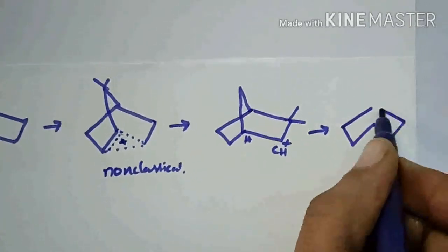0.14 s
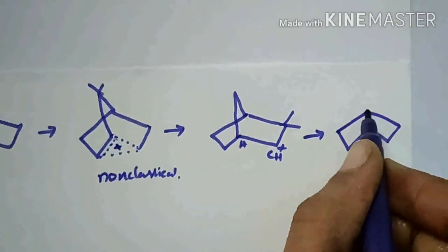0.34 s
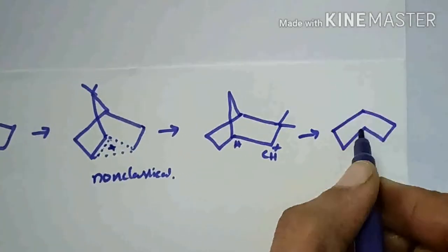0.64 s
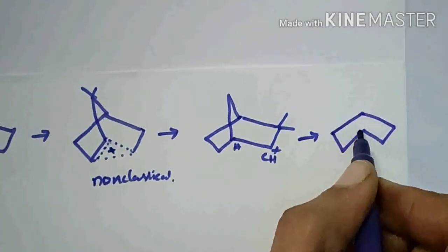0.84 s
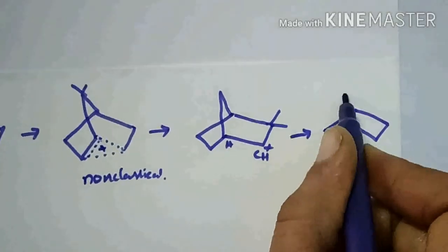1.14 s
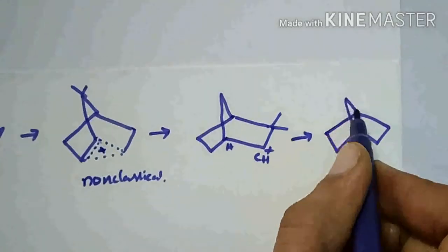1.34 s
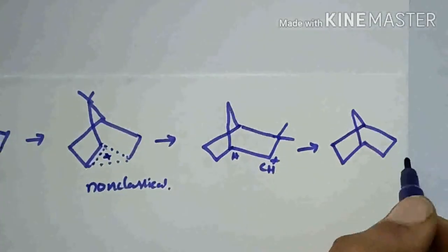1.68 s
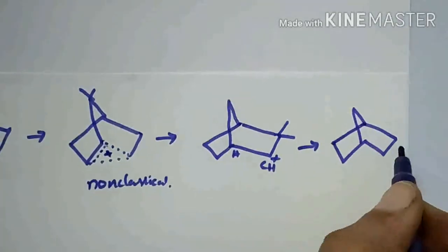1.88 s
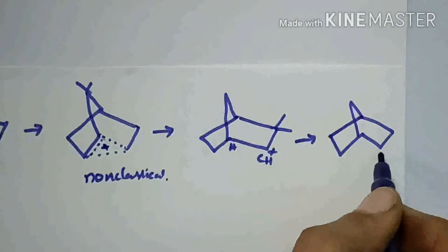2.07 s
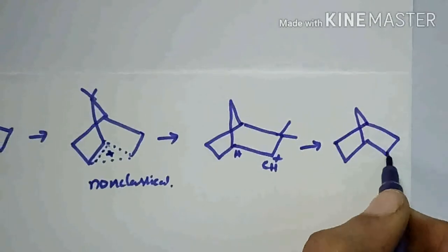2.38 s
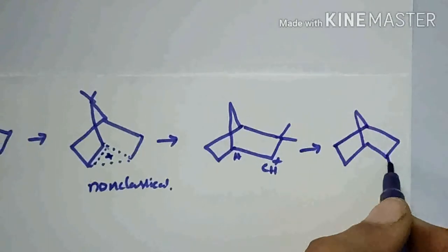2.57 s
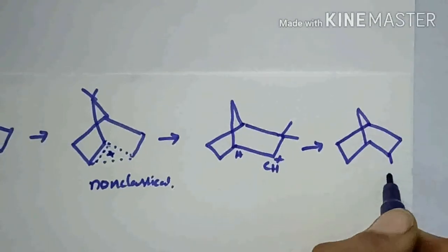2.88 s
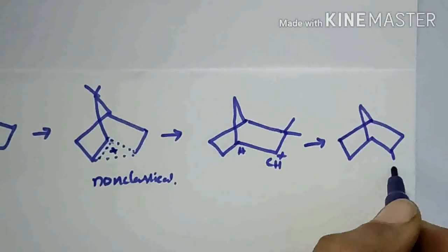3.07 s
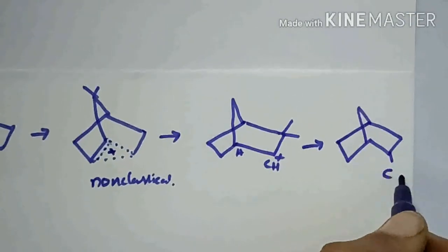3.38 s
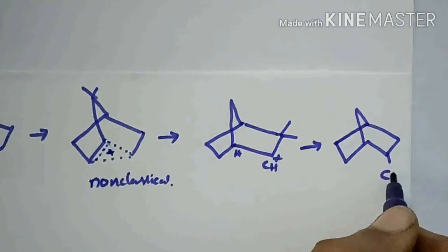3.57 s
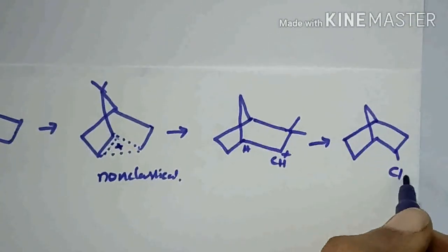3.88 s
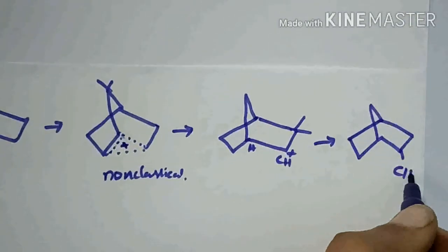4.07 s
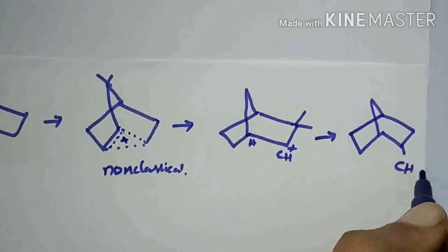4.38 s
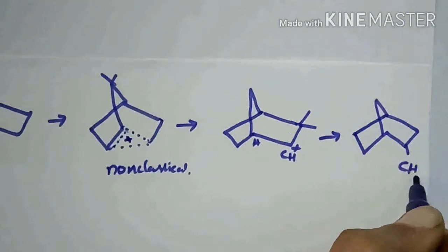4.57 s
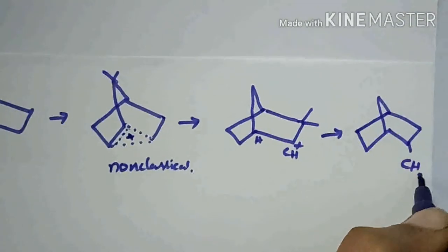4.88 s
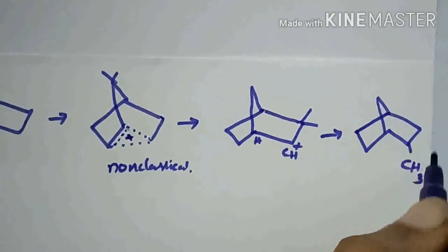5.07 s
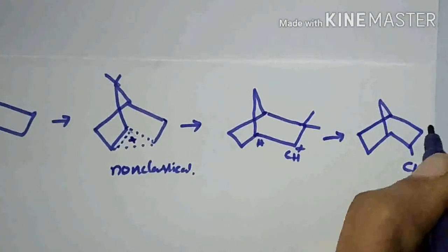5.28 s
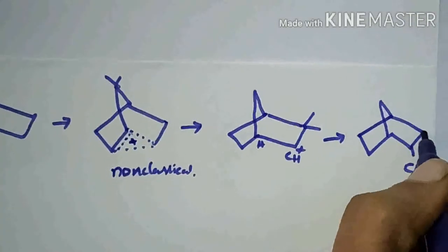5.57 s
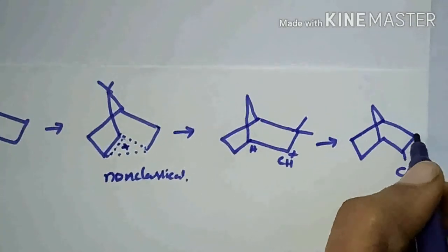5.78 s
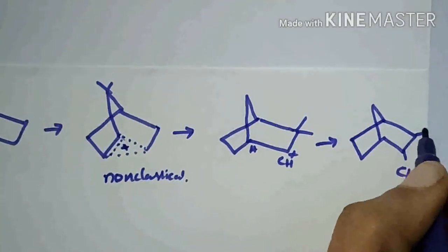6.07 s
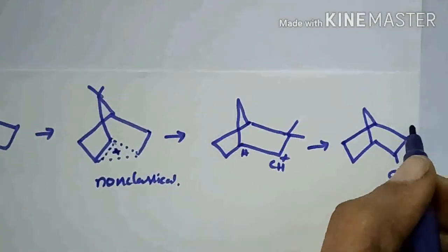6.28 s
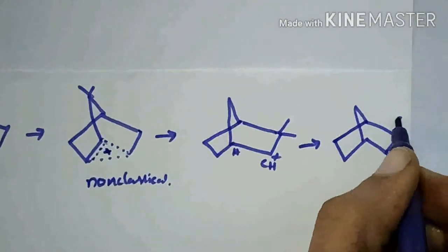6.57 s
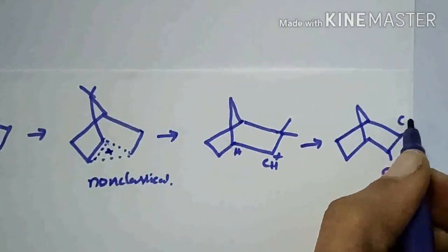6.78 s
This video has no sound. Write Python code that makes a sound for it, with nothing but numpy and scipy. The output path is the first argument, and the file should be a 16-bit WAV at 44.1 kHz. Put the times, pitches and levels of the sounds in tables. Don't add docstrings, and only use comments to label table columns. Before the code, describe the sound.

Short bright squeaky-dry marker rasps on a sheet lying on a desk, with small taps and pauses, above a faint motor hum and deep engine drone.

```python
import sys
import numpy as np
from scipy import signal
from scipy.fft import rfft, irfft, next_fast_len
from scipy.io import wavfile
from scipy.ndimage import uniform_filter1d

SR = 44100
rng = np.random.default_rng(int(sys.argv[2]) if len(sys.argv) > 2 else 0)


def wav_record(signal):
    frames = np.transpose(np.atleast_2d(signal))
    bounded = np.clip(frames, -1, 1)
    quanta = np.round(bounded * 32767).astype(np.int16)
    wavfile.write(sys.argv[1], SR, quanta)


def decibels_to_gain(level_db):
    exponent = np.asarray(level_db, float) / 20
    return 10 ** exponent


N = 306054


def rms_one(x):
    return x / np.sqrt(np.mean(x ** 2) + 1e-20)


def in_time(rows):
    s, value = np.transpose(rows)
    return np.interp(np.arange(N) / SR, s, value)


def drift(rate_hz):
    r = np.exp(-2 * np.pi * rate_hz / SR)
    wander = signal.lfilter([1], [1, -2 * r, r * r], rng.standard_normal(N + SR))
    return rms_one(wander[SR:])


def coloured(spectrum):
    hz, level_db = np.transpose(spectrum)
    size = next_fast_len(N)
    grid = np.fft.rfftfreq(size, 1 / SR) + 1
    curve_db = np.interp(np.log(grid), np.log(hz), level_db, -120, level_db[-1])
    gain = decibels_to_gain(curve_db - 60 * (grid > 16000))
    return rms_one(irfft(rfft(rng.standard_normal(size)) * gain, size)[:N])


def resonate(x, modes):
    out = 0
    for k, (hz, width_hz, level_db) in enumerate(modes):
        r = np.exp(-np.pi * width_hz / SR)
        top = (-1) ** k * decibels_to_gain(level_db) * (1 - r * r) / 2
        poles = [1, -2 * r * np.cos(2 * np.pi * hz / SR), r * r]
        out = out + signal.lfilter([top, 0, -top], poles, x + 1e-18)
    return out


def fibres(per_s, spread_db, clump_db):
    sizes = decibels_to_gain(spread_db * np.minimum(rng.exponential(1, (3, N)), 4))
    sizes = sizes * rng.choice([-1, 1], (3, N))
    happens = rng.random((3, N)) < per_s / SR
    return sizes * happens * decibels_to_gain(clump_db * drift(40))


def strokes():
    # (pitch [Hz], width [Hz], level [dB])
    felt_tip = [(6585, 1500, -5.5), (7220, 560, 0), (7530, 143, 3)]
    barrel = [(8950, 150, 5.5), (8940, 630, 2.5), (9490, 150, -0.5), (9940, 280, -5.5), (10610, 83, -0.5),
              (10440, 610, -6)]
    sizzle = [(11700, 1100, 1.5), (13100, 3700, -6.5), (14700, 1500, -11)]
    sheet_on_desk = [(1280, 610, 3), (1524, 320, 6), (1753, 245, 5), (2030, 306, 2)]
    grit = [(2450, 370, 0.5), (3514, 334, -0.5), (4026, 170, -4.5), (4430, 120, -2.5), (4800, 120, -1.5),
            (5370, 490, -5), (6400, 370, -9.5)]
    desk_boom = [(286, 30, 3), (412, 17, -3.5), (692, 120, -4.5), (910, 137, -4)]
    desk_ring = [(1045, 70, 0)]
    # (touch [s], speeding up [s], slowing down [s], scratch [dB], rasp re scratch [dB])
    pressed = [(0.047, 0.034, 0.035, -57.5, -2), (3.349, 0.014, 0.018, -71, -1),
               (5.892, 0.03, 0.012, -59, -1.5)]
    firm = [(0.099, 0.043, 0.054, -61, -3), (3.13, 0.047, 0.044, -64.5, -3),
            (3.721, 0.041, 0.018, -61.5, -13.5), (3.952, 0.014, 0.01, -61.5, -15),
            (4.059, 0.024, 0.028, -65, -7), (4.316, 0.023, 0.02, -65.5, -6.5),
            (4.368, 0.023, 0.019, -74.5, -4), (5.353, 0.041, 0.018, -70, -2.5),
            (6.551, 0.05, 0.053, -67.5, -8), (6.649, 0.03, 0.017, -71.5, -17)]
    quick = [(0.89, 0.0043, 0.029, -61, 3), (0.918, 0.044, 0.046, -47, -8.5),
             (1.045, 0.02, 0.071, -73.5, 1), (1.247, 0.019, 0.054, -59.5, -6.5),
             (1.3, 0.056, 0.03, -64.5, -2), (1.391, .021, .03, -96, 1), (1.509, 0.016, 0.064, -68.5, -4.5),
             (1.708, 0.0072, 0.044, -69.5, 2.5), (2.355, 0.026, 0.041, -64, -2.5),
             (3.043, 0.0082, 0.049, -70.5, -4.5), (3.247, 0.036, 0.0044, -58, -11),
             (4.25, 0.0085, 0.0088, -65.5, -10), (4.953, 0.027, 0.015, -53, -15.5),
             (5.016, 0.025, 0.026, -63.5, -18), (5.067, 0.022, 0.055, -59, -14.5),
             (5.073, 0.0046, 0.0074, -59, -28), (5.16, 0.035, 0.044, -66.5, -7)]
    grazes = [(.2, 0.096, 0.093, -80, 1), (0.463, 0.02, 0.0062, -74.5, -3),
              (1.858, .024, 0.21, -76.5, -4.5), (2.228, 0.018, 0.014, -76, -19),
              (2.679, 0.054, 0.074, -78, -8), (3.311, 0.016, 0.0047, -77, -10),
              (3.634, 0.012, 0.02, -75, -20), (4.59, 0.049, 0.042, -73, -6.5),
              (4.732, 0.038, 0.024, -70.5, -10), (5.258, 0.055, 0.024, -73, -14),
              (5.64, 0.019, 0.04, -79, -18), (6.351, 0.0089, 0.016, -78, -6),
              (6.46, 0.0092, 0.049, -74.5, -8)]
    knocks = [(3.9068, 0.0018, 0.02, -72.5, 18), (3.925, 0.012, 0.051, -83.5, 17.5)]
    # (touch-down re fastest [dB], sizzle re scratch [dB], then re rasp: grit, boom, ring [dB])
    kinds = [
        (-2, -5.5, 4, -1.5, 8),
        (-4.5, -4.5, 3, 2, -0.5),
        (-13, -4.5, 1, -2, -30),
        (-6, -6, 2, 8.5, 4.5),
        (-5, -3, 0.5, -3, -6),
    ]
    attacks = [.0015, 0.0094, 0.0069, .006, 0.0024]
    # (time [s], level [dB])
    lean = [(.05, -7), (.2, -6), (.9, -7.5), (1.03, 3), (1.27, 3.5), (1.36, 0.5), (1.52, -7), (2.39, -4),
            (3.07, -10), (3.2, -5), (3.28, 0.5), (3.75, -1), (4.6, -5), (4.99, -1), (5.08, -1.5), (5.9, -5),
            (6.48, -9), (6.62, -4.5)]
    lift_db, fade_db, fade_share = -5.5, -26, 0.74
    rasp_follows, grit_follows, ring_follows = 0.56, 0.73, 2.6

    gains = np.zeros((7, N))
    groups = (pressed, firm, quick, grazes, knocks)
    for rows, attack, (touch_db, sizzle_db, grit_db, boom_db, ring_db) in zip(groups, attacks, kinds):
        for touch, rise, fall, level_db, rasp_db in rows:
            s = touch + np.cumsum([-attack, attack, rise, fall, fade_share * (rise + fall)])
            at = np.arange(round(s[0] * SR), round(s[-1] * SR))
            swing_db = np.interp(at / SR, s, [fade_db, touch_db, 0, lift_db, fade_db])
            raspier_db = rasp_db + 8
            gains[:2, at] += decibels_to_gain(level_db + swing_db)
            gains[2, at] += decibels_to_gain(level_db + sizzle_db - 0.24 * raspier_db + swing_db)
            base_db = level_db + rasp_db
            gains[3, at] += decibels_to_gain(base_db + rasp_follows * swing_db - 1.5)
            gains[4, at] += decibels_to_gain(base_db + grit_follows * swing_db + grit_db - 0.44 * raspier_db)
            gains[5, at] += decibels_to_gain(base_db + rasp_follows * swing_db + boom_db)
            build = np.clip((at / SR - touch) / 0.018, 0, 1)
            gains[6, at] += decibels_to_gain(base_db + ring_follows * swing_db + ring_db) * build
    gains[:3] *= decibels_to_gain(in_time(lean) * [[.5], [-.5], [-.5]] + [[-5.5], [-2.5], [0]])

    snaps = fibres(per_s=9000, spread_db=2.0, clump_db=0.5)
    steep = signal.butter(2, 5200, "high", fs=SR, output="sos")
    layers = [signal.sosfilt(steep, resonate(snaps, modes)) for modes in (felt_tip, barrel, sizzle)]
    layers += [resonate(snaps, modes) for modes in (sheet_on_desk, grit, desk_boom, desk_ring)]
    pen = 0
    for gain, layer in zip(gains, layers):
        wander = decibels_to_gain(1 * drift(7.7))
        pen = pen + gain * wander * rms_one(layer)
    return pen


def ticks():
    # (time [s], peak level [dB], pitch [Hz])
    touches = [(0.8904, -47, 10700), (0.8913, -56, 2400), (0.9197, -49, 1800), (1.715, -53, 8660),
               (2.2398, -61, 9610), (2.2425, -59, 8500), (2.247, -62, 9400), (2.252, -59, 9380),
               (2.264, -65, 9800), (2.281, -63, 9600), (2.2562, -54, 9900), (3.048, -61, 10270),
               (3.1383, -60, 10000), (3.6416, -59, 8420), (3.9614, -56, 12740), (4.2547, -58, 8300),
               (4.6162, -56, 11600), (5.0789, -55, 12010), (6.3555, -53, 14300), (2.2565, -60, 12800),
               (2.2565, -63, 8000), (5.083, -57, 7500), (5.2036, -49, 9280), (5.2045, -51, 6100),
               (5.6466, -63, 10200), (5.676, -56, 9490), (6.3555, -59, 11000), (6.4647, -59, 9160),
               (0.0493, -63, 3150), (3.3674, -49.5, 4360), (5.8925, -60, 3475)]
    out, age = np.zeros(N + 512), np.arange(512) / SR
    for s, peak_db, hz in touches:
        puff = rng.standard_normal(512) * np.exp(-age / 0.00066)
        burst = resonate((age == 0) + 0.5 * puff, [(hz, 2600, 0)])
        burst = resonate(burst, [(hz, 5000, 0)])
        out[round(s * SR):][:512] += decibels_to_gain(peak_db + 7.5) * burst / np.abs(burst).max()
    return out[:N]


def landings():
    # (time [s], peak level [dB], hardness [dB per octave])
    hits = [
        (.048, -52.5, -8),
        (3.908, -59, 6),
        (5.893, -50.5, -8.5),
    ]
    # (pitch [Hz], level [dB], time to fall 60 dB [s])
    desk_modes = [(383, -2, 0.027), (770, 5.5, 0.032), (1247, 9, 0.06), (1657, 0.5, .1), (1900, 2, 0.068),
                  (2530, -4.5, .035), (3480, -10, 0.047)]
    s, peak_db, hard_db = np.transpose(hits)
    out = 0
    for hz, level_db, t60 in desk_modes:
        clicks = np.full(N, 1e-18)
        clicks[(s * SR).astype(int)] = decibels_to_gain(peak_db + level_db + hard_db * np.log2(hz / 800))
        r, w = decibels_to_gain(-60 / (t60 * SR)), 2 * np.pi * hz / SR
        out = out + signal.lfilter([0, np.sin(w)], [1, -2 * r * np.cos(w), r * r], clicks)
    return out


def pings():
    # (time [s], peak level [dB], pitch [Hz], width [Hz])
    taps = [(2.1854, -54.5, 4940, 453), (2.1845, -56.5, 2710, 797), (2.1843, -57, 7420, 897),
            (2.244, -65, 4800, 400), (3.903, -64, 5580, 500), (3.909, -58, 3600, 600)]
    out, click = np.zeros(N + 1024), np.arange(1024) == 0
    for s, peak_db, hz, width_hz in taps:
        burst = resonate(click, [(hz, width_hz, 0)])
        burst = resonate(burst, [(hz, 2 * width_hz, 0)])
        out[round(s * SR):][:1024] += decibels_to_gain(peak_db) * burst / np.abs(burst).max()
    return out[:N]


def at_microphones(x):
    # (delay [ms], gain [factor])
    left_paths = [(.2, 0.48), (.37, 0.41), (.71, 0.063), (1.3, 0.078), (2.3, -0.16)]
    right_paths = [(0, 0.12), (0.087, -0.18), (0.478, 0.49), (1.048, -0.25), (1.898, -0.44)]
    room_t60_s, room_db = 0.12, -13
    size = next_fast_len(N + SR // 2)
    turn, age = -2j * np.pi * np.fft.rfftfreq(size, 1 / SR), np.arange(SR // 2) / SR
    out = []
    for paths in (left_paths, right_paths):
        near = sum(gain * np.exp(turn * ms / 1000) for ms, gain in paths)
        tail = rng.standard_normal(len(age)) * decibels_to_gain(-60 * age / room_t60_s) * (age > .003)
        tail = signal.lfilter([.6], [1, -.4], tail)
        far = decibels_to_gain(room_db) * rfft(tail / np.linalg.norm(tail), size)
        out.append(irfft(rfft(x, size) * (near + far), size)[:N])
    return np.array(out)


def motor():
    # (multiple [turning rate], level [dB rms], left over right [dB], right leads by [rad])
    tones = [(8, -80, 11, -2), (9, -72.5, -10, -0.6), (10, -79.5, -13.5, 0.5), (12, -81.5, 9.5, -2),
             (13, -83.5, 4, -1), (15, -93.5, -4, -11), (16, -75, -3, 1.5), (20, -76.5, 3, 1.82),
             (24, -94, -18, -5), (27, -85, -7.5, 2.5), (38, -79, 0.5, -2.5), (39, -89, 3, 1.5),
             (40, -89, 2, -2.5)]
    turning_hz = 48.79 * (1 + 0.000452 * drift(0.81))
    turns = 2 * np.pi * np.cumsum(turning_hz) / SR
    flicker = [decibels_to_gain(1.1 * drift(5)), decibels_to_gain(1.1 * drift(5))]
    out = 0
    for k, (multiple, level_db, pan_db, lead) in enumerate(tones):
        phase = multiple * turns + rng.uniform(0, 2 * np.pi)
        pair = np.array([decibels_to_gain(pan_db / 2) * np.sin(phase), decibels_to_gain(-pan_db / 2) * np.sin(phase + lead)])
        out = out + np.sqrt(2) * decibels_to_gain(level_db) * flicker[k % 2] * pair
    return out


def drone():
    # (middle [s], half width [s], pitch [Hz], level [dB])
    swells = [(0, 0.02, 51.1, -50.5), (.5, 0.13, 54.35, -41), (.75, 0.11, 52.4, -44),
              (1.142, 0.15, 52.6, -42.5), (1.39, 0.23, 47.93, -51), (1.72, 0.065, 50.46, -54.5),
              (2.22, 0.1, 50.6, -56), (2.47, 0.3, 48.2, -56), (2.7, 0.055, 47.3, -59),
              (2.88, 0.075, 49, -58), (3.15, 0.038, 49.72, -53), (3.45, 0.22, 52, -45),
              (3.87, 0.069, 50.2, -54.5), (5.079, 0.092, 47.67, -54.5), (5.989, 0.034, 48.57, -53),
              (6.19, 0.1, 51.2, -59.5), (6.94, 0.052, 48.2, -50.5)]
    t = np.arange(N) / SR
    size = decibels_to_gain(-64.5)
    for middle, width, _, level_db in swells:
        size = size + decibels_to_gain(level_db) * np.exp(-2 * ((t - middle) / width) ** 2)
    middles, _, hz, _ = np.transpose(swells)
    pitch = np.interp(t, middles, hz) + 1.61 * drift(5.6)
    return np.sqrt(2) * size * np.sin(2 * np.pi * np.cumsum(pitch) / SR) * decibels_to_gain([[.6], [-.6]])


def whine():
    # (pitch [Hz], width [Hz], level [dB])
    tone = [(1126, 35, 0)]
    middle_s, half_width_s, level_db = 1.17, 0.14, -72.5
    swell = np.exp(-2 * ((np.arange(N) / SR - middle_s) / half_width_s) ** 2)
    narrow = resonate(resonate(rng.standard_normal(N), tone), tone)
    return decibels_to_gain(level_db) * swell * rms_one(narrow)


def sway():
    # (time [s], level [dB])
    strength = [(0.0, -43), (0.15, -42), (0.77, -40.5), (1.16, -46.5), (1.7, -38.5), (2.09, -53.5),
                (2.3, -44), (3.03, -51), (3.4, -46.5), (3.98, -43.5), (4.3, -46), (4.7, -38), (5.04, -48.5),
                (5.37, -40.5), (6.0, -46), (6.65, -52), (6.94, -46)]
    band = signal.butter(1, [1.5, 6.0], "band", fs=SR, output="sos")
    low = signal.butter(2, 15, fs=SR, output="sos")
    swing = signal.sosfilt(low, signal.sosfilt(band, rng.standard_normal(N + SR)))[SR:]
    swing = swing / np.sqrt(uniform_filter1d(swing ** 2, 12000) + 1e-20)
    return decibels_to_gain(in_time(strength)) * swing * decibels_to_gain([[1.5], [-1.5]])


def room_tone():
    # (frequency [Hz], level [dB per Hz])
    rumble = [(16, -43), (27, -15), (58, -9), (67, -7), (81, -18.5), (114, -11.5), (151, -21.5),
              (248, -19.5), (355, -23.5), (440, -26), (514, -29.5), (758, -34), (819, -34.5), (987, -34.5),
              (1100, -39.5), (1430, -88), (2420, -120)]
    hiss = [(650, -17.5), (1100, -2.5), (1390, -5.5), (1920, -6), (2130, -7.5), (2520, -9), (2680, -10),
            (2890, -11), (6550, -14.5), (11200, -12), (13500, -16.5)]
    left_right_difference = [(16, -52), (27, -2), (59, 4.5), (83, -24.5), (234, -11), (273, -14),
                             (403, -26), (436, -13.5), (644, -12.5), (734, -39), (1200, -18.5),
                             (1730, -25.5), (1870, -18), (2240, -30.5), (13500, -34.5)]
    # (time [s], level [dB])
    air = [(0.0, -59), (1.0, -56.5), (1.3, -57.5), (4.5, -61), (6.94, -60.5)]
    swell_db = in_time(air)
    mid = decibels_to_gain(-57 + swell_db - np.mean(swell_db)) * coloured(rumble) + decibels_to_gain(-74.5) * coloured(hiss)
    side = decibels_to_gain(-65) * coloured(left_right_difference)
    return np.array([mid + side, mid - side])


def scene():
    pen = strokes()
    high = signal.butter(4, 12100, "high", fs=SR, output="sos")
    straight = decibels_to_gain(1) * signal.sosfilt(high, pen[1] + pen[2])
    sheet = decibels_to_gain(-2.5) * pen[1:]
    near = at_microphones(pen[0] + ticks() + landings()) + pings() + straight + sheet
    return near + room_tone() + motor() + drone() + sway() + whine()


def band_level(cells, low_hz, high_hz):
    bins = slice(round(low_hz * 2048 / SR), round(high_hz * 2048 / SR))
    return bins, 10 * np.log10(np.sum(np.abs(cells[:, bins]) ** 2, axis=1) + 1e-20)


def low_pass(x):
    return signal.sosfilt(signal.butter(12, 15670, fs=SR, output="sos"), x)


def record(dry):
    return low_pass(dry)


dry = scene()
out = record(dry)
wav_record(out)
```